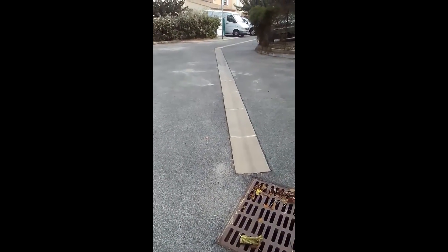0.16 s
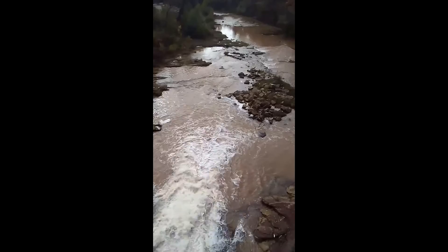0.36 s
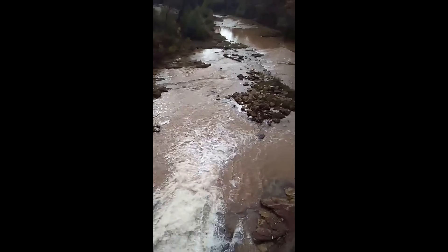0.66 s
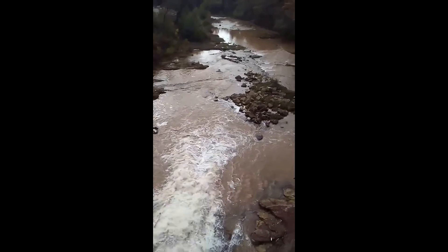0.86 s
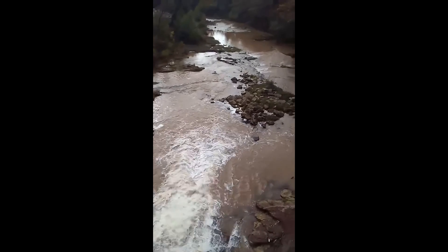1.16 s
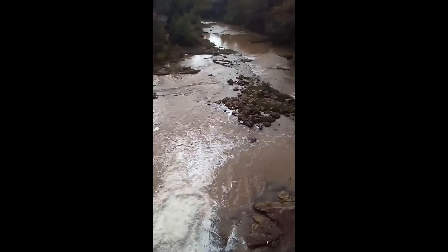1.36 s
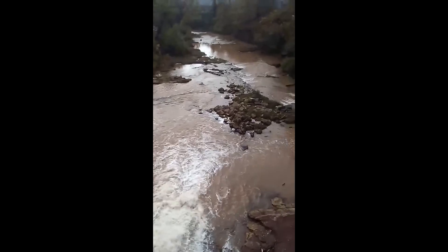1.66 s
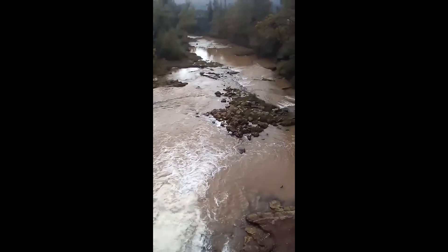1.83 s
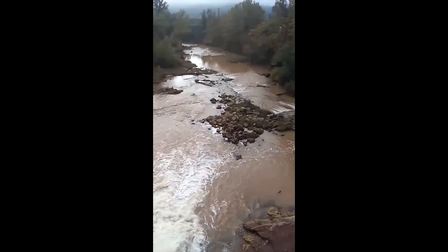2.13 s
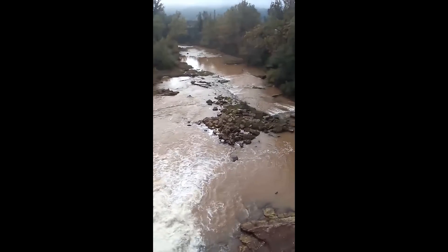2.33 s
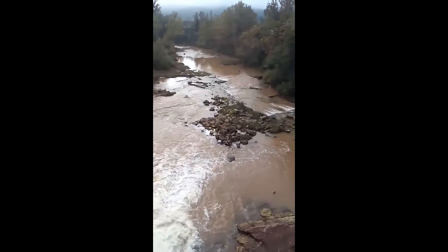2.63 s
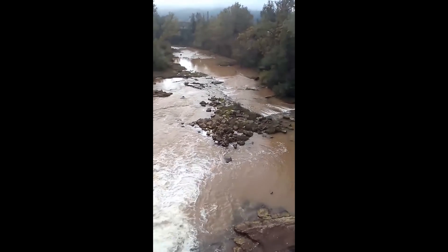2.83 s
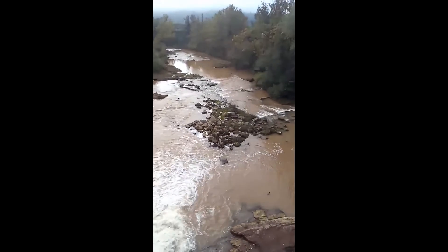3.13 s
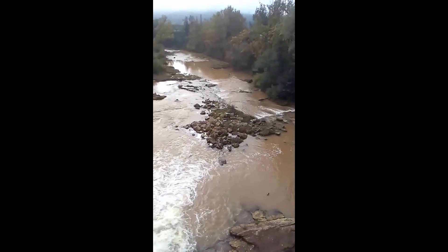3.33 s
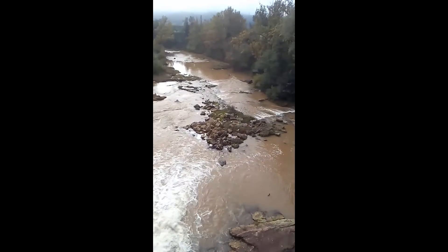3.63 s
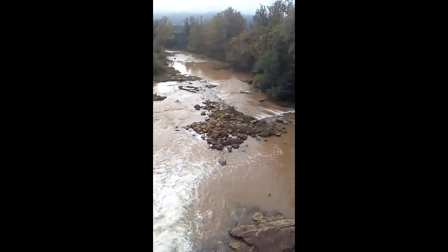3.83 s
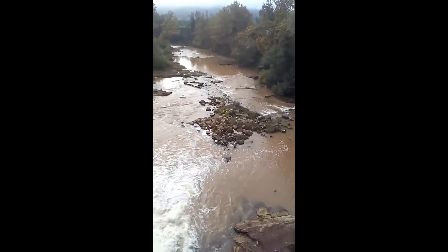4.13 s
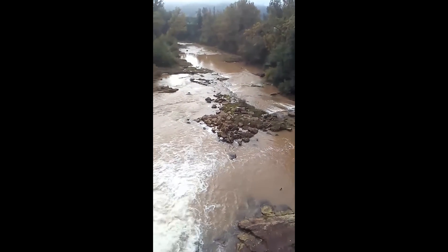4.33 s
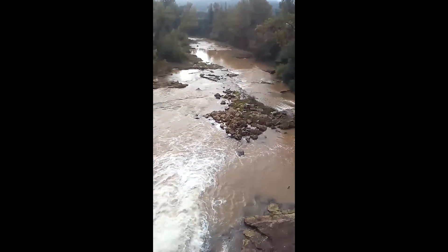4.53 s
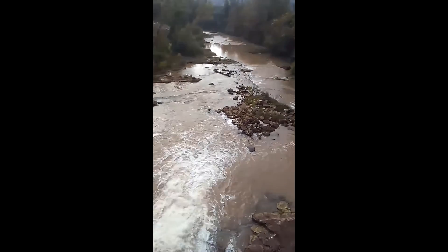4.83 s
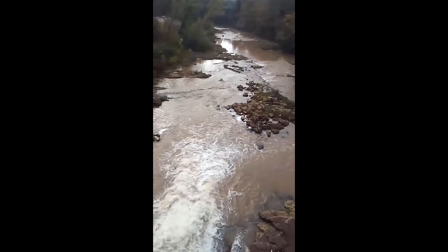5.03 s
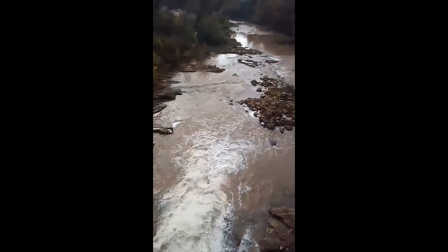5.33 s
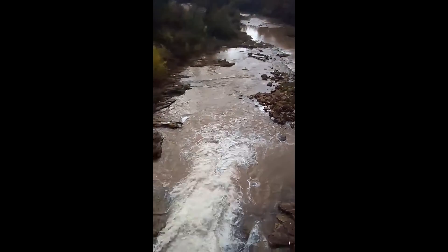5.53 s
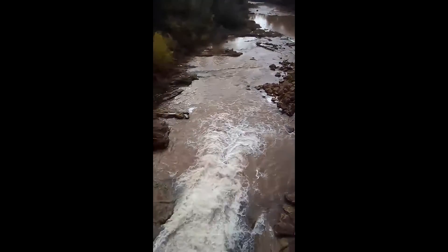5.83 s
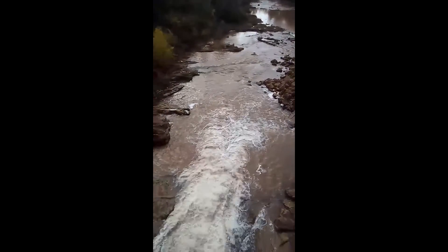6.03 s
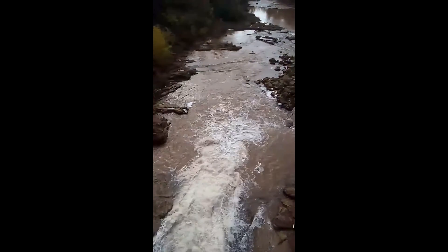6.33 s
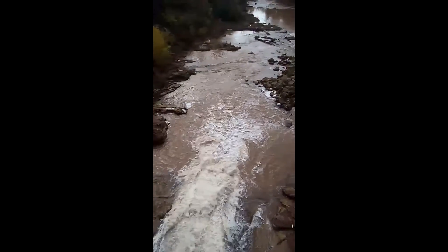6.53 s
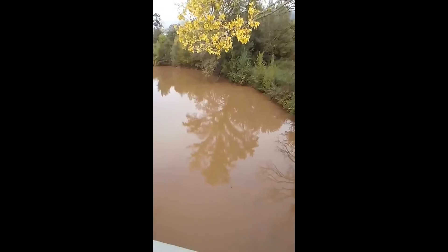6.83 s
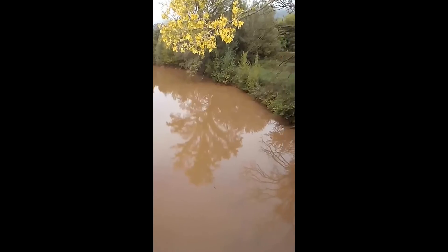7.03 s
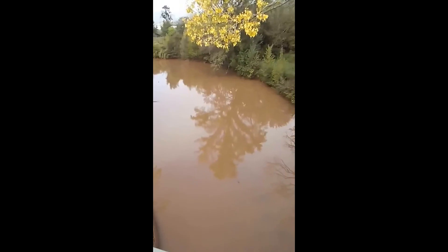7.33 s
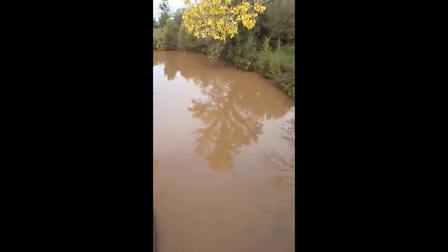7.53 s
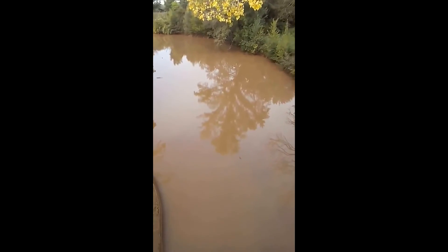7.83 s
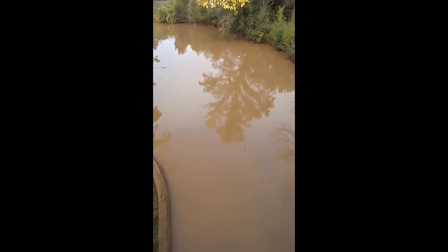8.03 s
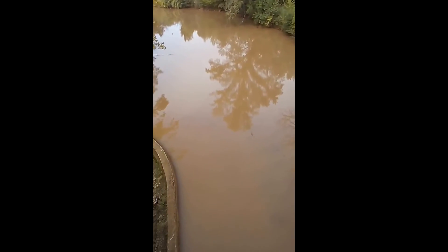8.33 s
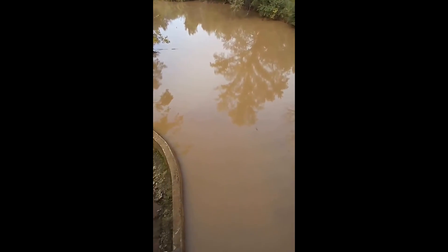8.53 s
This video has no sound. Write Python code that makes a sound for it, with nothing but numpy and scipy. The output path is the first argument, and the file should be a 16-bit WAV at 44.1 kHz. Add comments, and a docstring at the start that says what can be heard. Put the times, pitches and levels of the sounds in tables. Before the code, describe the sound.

Brief distant traffic hum, loud dense rapids below a bridge with a few car whooshes, then a hard cut and soft far-off falling water.

```python
"""Street, rapids and far weir

Three places in a row at one microphone: a moment of street hum, then white water roaring over rocks below
a bridge while cars pass behind, then a far weir across a still pool. The street and the rapids end on hard
cuts; the weir fades in and runs to the end. The hum and the weir are coloured noise; the rapids are dense
random clicks, coloured by water and phone; the cars are tyre noise with a wavering engine tone."""
import sys
import numpy as np
from scipy import signal
from scipy.io import wavfile
from scipy.ndimage import map_coordinates

SR = 44100
rng = np.random.default_rng(int(sys.argv[2]) if len(sys.argv) > 2 else 0)


def generate_wav(sig):
    """Save sig (samples, or channels by samples) to the path in sys.argv[1] as 16-bit PCM at SR."""
    pcm = np.round(np.clip(np.atleast_2d(sig).T, -1, 1) * 32767).astype(np.int16)
    wavfile.write(sys.argv[1], SR, pcm)


N = 381906

FRAME, HOP = 2048, 512  # spectral frame and its step, samples
HZ = np.arange(FRAME // 2 + 1)[:, None] * SR / FRAME + 1e-3  # band centres, kept above 0 for the logarithms
T = np.arange(-(-N // HOP) + 1) * HOP / SR  # frame times, s


def undb(db):
    """Gain of a level in dB."""
    return 10 ** (np.asarray(db) / 20)


def steps(table):
    """Each column of changes summed as smooth half-cosine steps, one value a frame."""
    start_s, end_s, *changes = np.transpose(table)
    done = np.clip((T[:, None] - start_s) / (end_s - start_s), 0, 1)
    eased = (1 - np.cos(np.pi * done)) / 2
    return [eased @ change for change in changes]


def colour(points):
    """A spectrum in dB over HZ, joined along log frequency and set to unit power."""
    hz, level_db = np.transpose(points)
    level_db = np.interp(np.log(HZ), np.log(hz), level_db)
    mean_power = np.mean(undb(2 * level_db))
    return level_db - 10 * np.log10(mean_power)


def bell(hz, width_hz):
    """Outline of a resonance, 1 at its centre."""
    return np.exp(-((HZ - hz) / width_hz * 2) ** 2)


def churn(rate, octaves):
    """Random swells about 1 / rate s long and some octaves wide."""
    band = np.log2(np.maximum(HZ, 20) / 20) / octaves + 0 * T
    moment = T * rate + 0 * HZ
    grid = rng.standard_normal((int(band.max()) + 2, int(T[-1] * rate) + 2))
    return map_coordinates(grid, [band, moment], order=1, mode="nearest")


def gurgle(low_db, high_db):
    """Clumps of like-sized bubbles flicker in narrow ranges, less so in the dense spray."""
    depth_db = np.interp(np.log(HZ), np.log([1500, 4000]), [low_db, high_db])
    return depth_db * churn(rate=20, octaves=.07)


def bubbles(scatter_db):
    """Countless bursting bubbles: a click every sample, a few of them larger."""
    clicks = rng.standard_normal(N) * undb(scatter_db * rng.exponential(size=N))
    return clicks / clicks.std()


def shape(sound, level_db):
    """Gives a sound a colour that may change frame by frame."""
    spectrum = signal.stft(sound, nperseg=FRAME, noverlap=FRAME - HOP)[2]
    coloured = spectrum * undb(level_db + 0 * T)
    return signal.istft(coloured, nperseg=FRAME, noverlap=FRAME - HOP)[1][:N]


def span(start_s, full_s, cut_s, depth_db, bend):
    """Silence, a rise from depth_db that slows towards its end if bend > 1, and silence from cut_s on."""
    t = np.arange(N) / SR
    fade_db = depth_db * np.interp(t, [start_s, full_s], [1, 0]) ** bend
    return undb(fade_db) * (t >= start_s) * (t < cut_s)


def street():
    """Tyre hum of distant traffic: coloured noise with small random swells."""
    # Colour of the hum: hz, relative level_db (per Hz)
    hum_colour = [(10, -60), (25, -20), (60, -13), (300, -7), (600, -9), (1170, 0), (1650, -6), (2000, -18),
                  (2690, -17), (3900, -28), (4900, -43), (6200, -33), (7700, -50), (15000, -56)]
    hum_db = -41
    level_db = colour(hum_colour) + hum_db + 1.5 * churn(rate=12, octaves=.7)
    return shape(rng.standard_normal(N), level_db)


def weir():
    """Far falling water, smooth with distance; its spray fades as the roar grows."""
    # Colour of the far water: hz, relative level_db (per Hz)
    weir_colour = [(10, -60), (22, -24), (53, -22), (91, -9), (280, 0), (1100, -4.5), (2050, -9),
                   (2600, -15), (5500, -20), (6600, -17), (7500, -26), (8500, -45), (10000, -54),
                   (15000, -60)]
    middle_s, middle_db = 7.75, -39  # the roar passes this level at this moment
    swell_db_per_s, spray_fade_db_per_s = 2.2, 2.8
    since_s = T - middle_s
    roar_db = middle_db + swell_db_per_s * since_s
    spray_db = -spray_fade_db_per_s * since_s / (1 + (4000 / HZ) ** 4)  # mostly above 4 kHz
    level_db = colour(weir_colour) + roar_db + spray_db
    level_db = level_db + .5 * churn(rate=4, octaves=.6) + gurgle(low_db=1.8, high_db=1.2)
    return shape(rng.standard_normal(N), level_db)


def passing(closest_s, peak_db, spread_s):
    """Level a frame of sources that drive by: power falls with the square of distance."""
    power = undb(2 * peak_db) / (1 + ((T[:, None] - closest_s) / spread_s) ** 2)
    return 10 * np.log10(power.sum(axis=1))


def tyres(level_db):
    """Tyre roar on the road behind: coloured noise that flutters as it follows the passing level."""
    # Colour of the tyre roar: hz, relative level_db (per Hz)
    tyre_colour = [(150, -30), (480, -8), (650, -5), (880, 0), (1250, -4), (1600, 1.5), (2100, -11),
                   (2800, -21), (6000, -50), (12000, -90)]
    flutter_db = 2.2 * churn(rate=12, octaves=.5)
    return shape(rng.standard_normal(N), colour(tyre_colour) + level_db + flutter_db)


def engine(level_db):
    """Firing tone of an engine: one sine that wavers in pitch and level."""
    firing_hz = 82
    waver_hz, waver_db = 2.5 * rng.standard_normal((2, len(T) // 8 + 1))
    t, knots_s = np.arange(N) / SR, np.linspace(0, T[-1], len(waver_hz))
    phase = 2 * np.pi * np.cumsum(firing_hz + np.interp(t, knots_s, waver_hz)) / SR
    tone_db = np.interp(t, T, level_db) + np.interp(t, knots_s, waver_db)
    return np.sqrt(2) * undb(tone_db) * np.sin(phase)  # root 2 makes tone_db its RMS level


def cars():
    """Cars on the road behind: the engines are loudest earlier and carry wider than the tyres."""
    # Cars going by: closest_s, tyre_db, engine_db, spread_s (time to travel their distance from the phone)
    car_passes = [(1.4, -34.5, -72, .3), (2.63, -24.5, -52, .27), (3.7, -35, -66, .4), (6.4, -31, -62, .45)]
    engine_lead_s, engine_widening = .2, 1.5
    closest_s, tyre_db, engine_db, spread_s = np.transpose(car_passes)
    tyre_level_db = passing(closest_s, tyre_db, spread_s)
    engine_level_db = passing(closest_s - engine_lead_s, engine_db, spread_s * engine_widening)
    return tyres(tyre_level_db) + engine(engine_level_db)


def phone():
    """Resonances and shadows of the phone and the hand round it, in dB, shifting as the hand moves."""
    # Peaks and dips: hz, width_hz, level_db, tilt_db and turn_db (added per unit of tilt and of turn)
    resonances = [(1600, 450, 5.5, -2.5, -4), (1850, 400, 1, 1, 2), (2250, 300, 2, -3, -2),
                  (2750, 700, -1, -1, 4.5), (3280, 450, 6, -5, -1), (4250, 900, 4, .6, 0),
                  (5050, 450, -2.5, 2.5, 0), (5420, 350, 0, 4.5, -1), (5800, 600, 6, .5, .5),
                  (6400, 500, 3, 0, 1), (6750, 350, -1.5, 4.5, 0), (7200, 700, 3.5, 1, 0),
                  (8900, 900, 3, -1.5, 2), (12100, 600, 3.5, 0, 0), (13700, 600, 4, 0, 0)]
    # Moves of the holding hand: start_s, end_s, change of tilt, change of turn (both start at 0)
    hand_moves = [(1.6, 2.1, .65, 0), (2.8, 4.0, .3, 0), (4.0, 4.9, -.35, .7), (4.9, 6.0, -.55, .4),
                  (6.5, 6.9, .3, 0)]
    tilt, turn = steps(hand_moves)
    return sum(bell(hz, width_hz) * (level_db + tilt_db * tilt + turn_db * turn)
               for hz, width_hz, level_db, tilt_db, turn_db in resonances)


def rapids():
    """White water below the bridge: bursting bubbles that surge and flicker, heard through the phone's body."""
    # Smooth colour of the white water: hz, relative level_db (per Hz)
    water_colour = [(10, -30), (21, -17), (43, -40), (90, -11), (300, 0), (420, 1), (590, -8.5), (850, -4),
                    (1300, -4.5), (2000, -4), (2500, -17), (7700, -19), (8200, -26), (15000, -60)]
    water_db = -27.2  # ahead of the phone's body
    surge_db = .4 * churn(rate=3, octaves=.5) + .5 * churn(rate=14, octaves=1.2)
    level_db = colour(water_colour) + water_db + phone() + surge_db + gurgle(low_db=2.4, high_db=1.3)
    return shape(bubbles(scatter_db=1.2), level_db)


def scene():
    """The three places one after another, the same left and right."""
    mono = street() * span(start_s=-1, full_s=0, cut_s=.2747, depth_db=0, bend=1)  # no fade-in
    bridge = rapids() + cars()
    mono = mono + bridge * span(start_s=.365, full_s=.6, cut_s=6.8414, depth_db=-66, bend=1.5)
    # the weir's cut lies past the end of the sound
    mono = mono + weir() * span(start_s=6.95, full_s=7.24, cut_s=9, depth_db=-70, bend=1.35)
    return np.array([mono, mono])


def record(dry):
    """A steep low-pass at the microphone's top end, with .2 dB ripple below and 70 dB loss above."""
    top_hz = 15400
    return signal.sosfilt(signal.ellip(12, .2, 70, top_hz, fs=SR, output="sos"), dry)


dry = scene()
out = record(dry)
generate_wav(out)
```